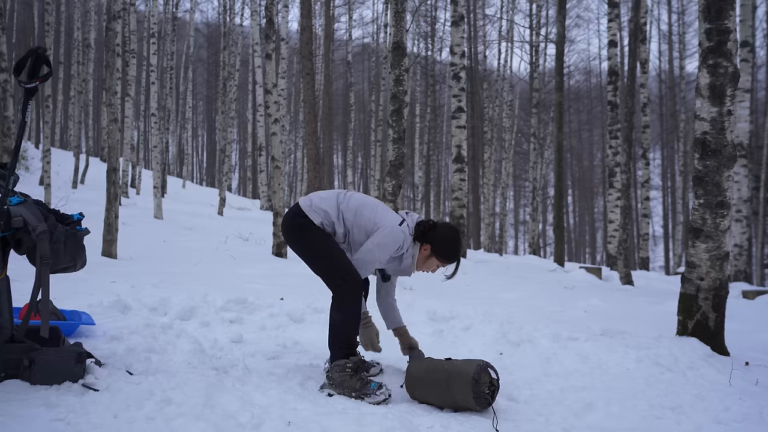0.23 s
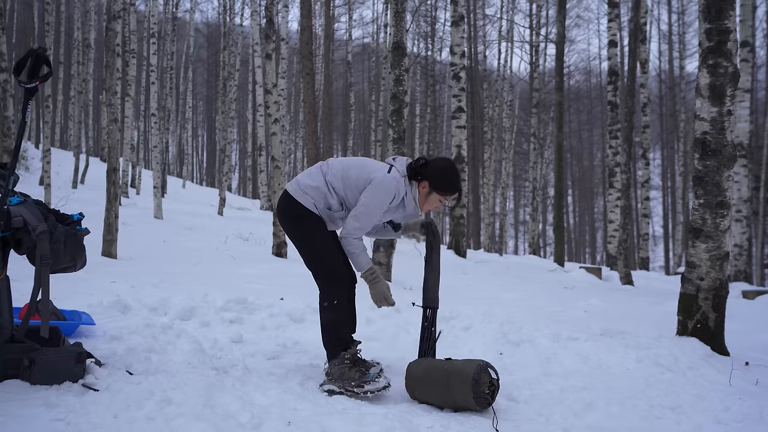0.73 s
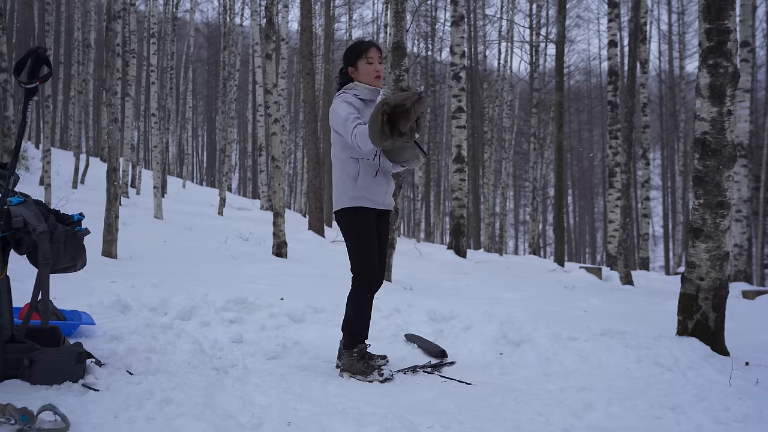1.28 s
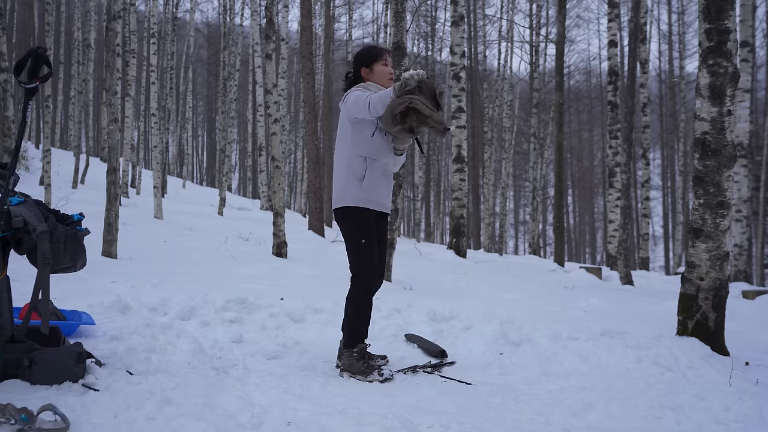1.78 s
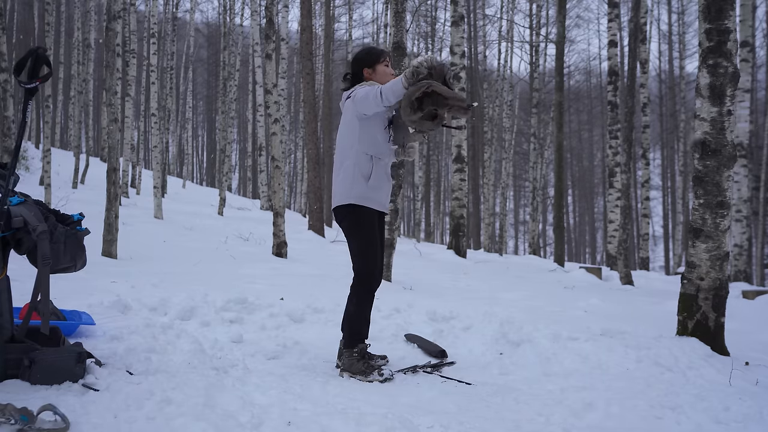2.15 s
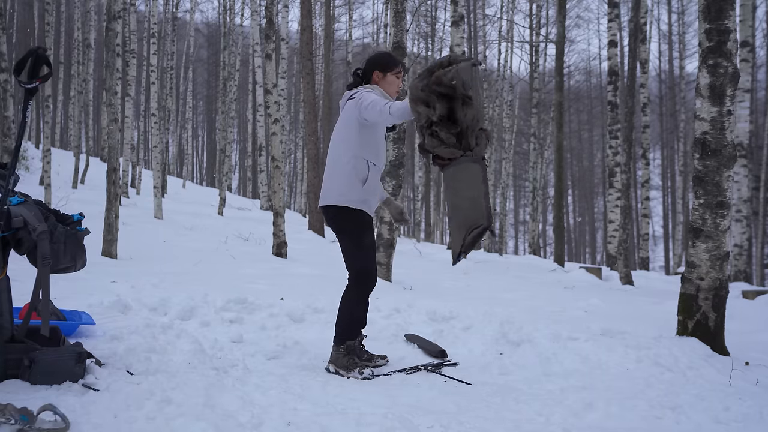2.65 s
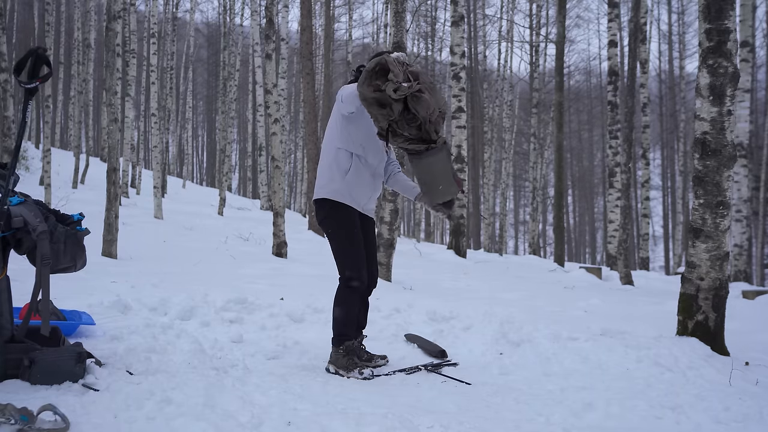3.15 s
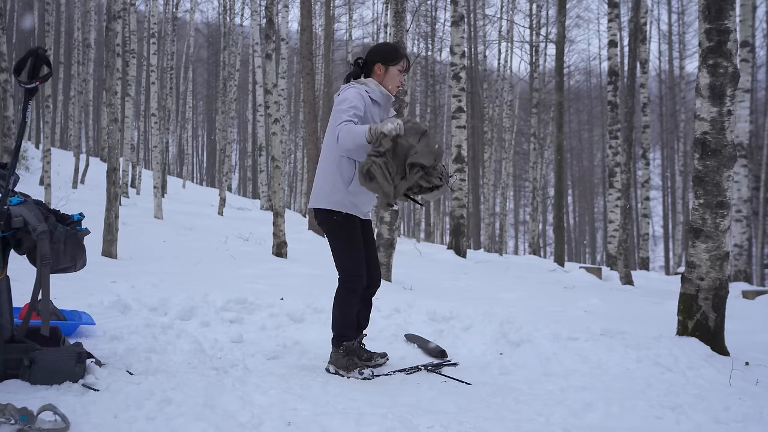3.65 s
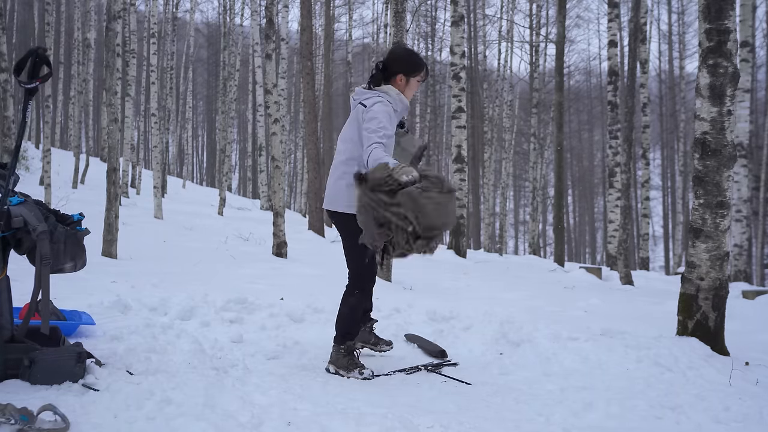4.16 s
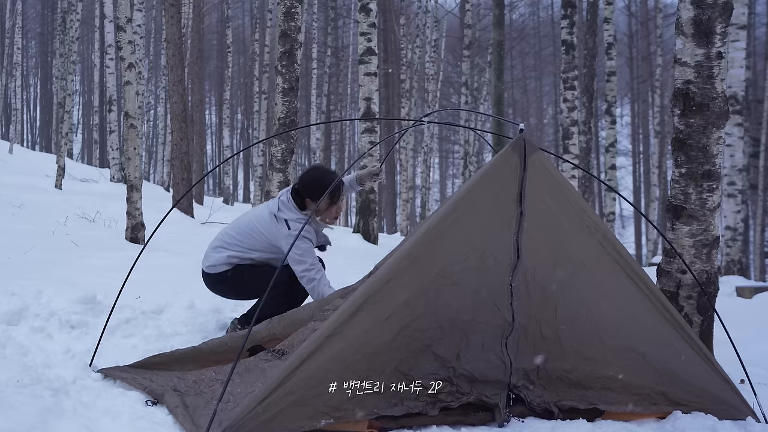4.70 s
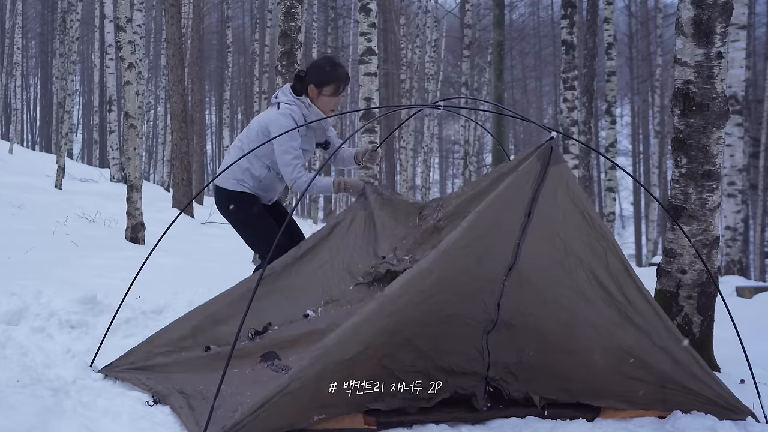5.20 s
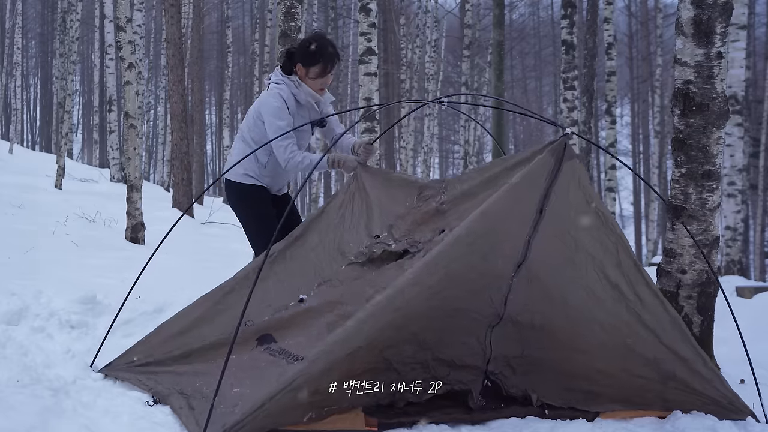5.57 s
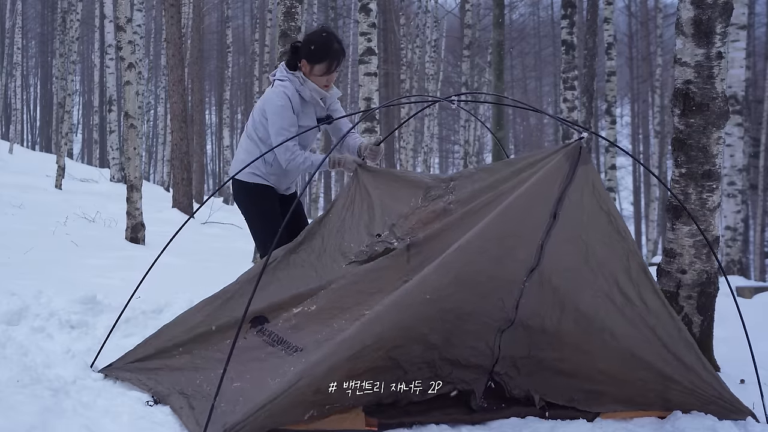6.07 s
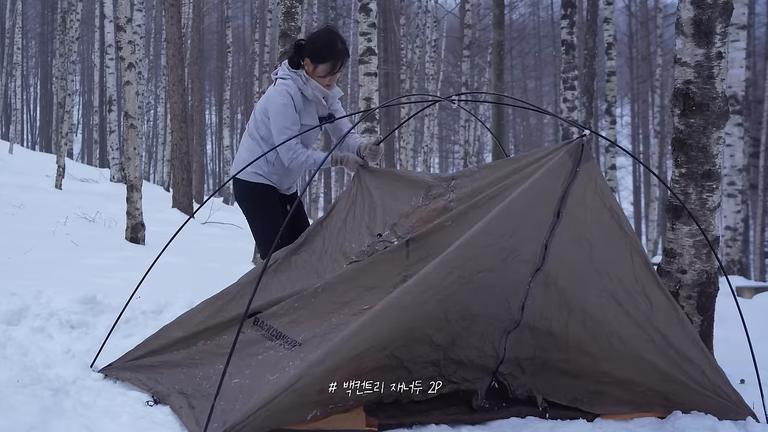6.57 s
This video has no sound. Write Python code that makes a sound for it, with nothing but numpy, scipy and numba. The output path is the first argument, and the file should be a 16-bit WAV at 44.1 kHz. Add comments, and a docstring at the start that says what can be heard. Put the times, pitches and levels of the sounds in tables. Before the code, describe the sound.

In a quiet snowy wood, a stiff nylon tent is unpacked close to a small microphone. Bright swishes and rasps come with knocking, jingling metal pegs or poles, then an abrupt cut. Cloth crumples and snaps, panels thud, a quieter shake-out follows, then stronger flaps. After another cut, fabric is drawn in a long hissing swish that settles into faint rustles and ticks. Dry, with no echo.

```python
"""Stiff nylon tent cloth is pulled from its bag, shaken out and dragged over poles in a still, snowy wood.
Filtered hiss and tiny damped tones make the weave swish, folds crumple and broad panels billow.
Short noise bursts make creases snap, panels thud and pegs knock; the knocks also set the metal ringing.
Narrow bands of noise rasp along a pole or cord. The snow gives no echo.
Three times the sound stops dead and the next passage fades in."""
import sys
import numpy as np
from scipy import signal
from scipy.fft import rfft, irfft
from scipy.io import wavfile
from scipy.ndimage import uniform_filter1d
from numba import njit

SR = 44100
rng = np.random.default_rng(int(sys.argv[2]) if len(sys.argv) > 2 else 0)


def boost_factor(decibels):
    """Convert a level in decibels to a linear amplitude factor."""
    exponent = np.asarray(decibels, float) / 20
    return 10 ** exponent


def file_out(sig):
    """Save sig as 16-bit WAV at sys.argv[1]."""
    # one column per channel
    cols = np.atleast_2d(sig).T
    # limit, then scale
    lim = np.clip(cols, -1, 1)
    pcm = np.round(lim * 32767).astype(np.int16)
    wavfile.write(sys.argv[1], SR, pcm)


N = 301644  # length in samples


def walk(rate):
    """Uneven motion: random levels, each held for 1 / rate seconds with smoothed steps; spread 1."""
    hold = int(SR / rate)
    steps = np.repeat(rng.standard_normal(N // hold + 1), hold)
    smooth = uniform_filter1d(steps, hold // 2)[:N]
    return smooth / np.std(smooth)


def colour(x, shape):
    """Gives a sound the tone colour drawn by (Hz, dB) points, without pre-echo; the result has rms 1."""
    hz, db = np.transpose(shape)
    grid_hz = np.linspace(1, SR / 2, 2049)
    # beyond the first and last points the level drops steeply
    curve_db = np.interp(np.log(grid_hz), np.log(hz), db, db[0] - 22.5, db[-1] - 27.5)
    # folding the cepstrum makes the filter respond as early as it can
    cepstrum = irfft(np.log(boost_factor(curve_db)))
    cepstrum[1:2048] *= 2
    cepstrum[2049:] = 0
    response = irfft(np.exp(rfft(cepstrum)))[:2048]
    y = signal.fftconvolve(x, response)[:N]
    return y / np.std(y)


@njit
def ring(start, hz, cycles, size, n):
    """Each tiny fold flicks over as a grain: a short sine that dies away."""
    out = np.zeros(n)
    for k in range(len(start)):
        turn = np.exp((2j * np.pi - 1 / cycles * 3) * hz[k] / SR)  # one sample of swing and decay
        z = size[k] + 0j
        for i in range(start[k], min(n, start[k] + int(2 * cycles * SR / hz[k]))):
            out[i] += z.real
            z *= turn
    return out


def cloth(shape, grain, crackle, tug):
    """Sliding weave hisses; tiny folds flick over as grains; uneven tugging shakes both."""
    rate, low_hz, high_hz, cycles, scatter_db, flicker_db, follow = grain
    when, pitch, strength, side = rng.random((int(rate * N / SR), 4)).T
    # many small grains, a few large ones, pushing either way
    size = boost_factor(-scatter_db * np.log(1 - .99 * strength)) * np.sign(side - .5)
    start = (when * N).astype(np.int64)
    flicks = ring(start, low_hz * (high_hz / low_hz) ** pitch, 1. * cycles, size, N)
    hiss = colour(rng.standard_normal(N), shape)
    mix = np.sqrt(crackle) * colour(flicks, shape) + np.sqrt(1 - crackle) * hiss
    # the jerkier the handling, the deeper the tugging
    shake_db = follow * tug * (0.26 + 1.15 * crackle)
    return mix * boost_factor(shake_db + flicker_db * walk(16))


def all_cloth(t, effort_db, bulk_db, taut_db, tug):
    """Five parts of the cloth follow the hands, each answering differently to bulk, tautness and spread."""
    # tone colour of each part: pitch_hz, level_db
    swish = [(1500, -19), (2600, -10.5), (3600, -2.5), (5200, 0), (7000, -6), (9000, -9), (12000, -15.5),
             (16400, -26)]
    sheen = [(6000, -3), (8500, 0), (10500, -0.5), (13000, -6.5), (16400, -8)]
    crumple = [(800, -36.5), (1250, -3.5), (1700, -0.5), (2500, -2), (3500, -7), (5000, -41.5)]
    rumple = [(350, -18), (600, -7.5), (900, -5.5), (1250, -4.5), (2000, -20.5)]
    billow = [(50, -58), (90, -29), (160, -13), (240, -3), (380, 1), (550, -2), (900, -27)]
    # grains, one row per part in that order: grains per second, low_hz, high_hz, length in cycles,
    # size_scatter_db, own_flicker_db, share of the tugging (0-1)
    grains = [(2450, 2710, 11800, 4.3, 4.5, 0.28, 0.42), (2500, 4600, 19000, 3.3, 7, 1.5, 0.46),
              (1167, 1300, 2600, 1.2, 4.5, 1.06, 0.4), (600, 510, 1640, 2.8, 3.5, 0.14, 0.26),
              (248.3, 137, 730, 3.5, 1, 1, 0.96)]
    # loudness, one row per part in that order: level_db over the effort,
    # then dB per dB of bulk, of tautness and of spread
    responses = [(-0.78, 0.215, -0.087, 0.039), (-0.5, 0.2, 0.93, 0.21), (-2, 1.02, -0.092, -0.49),
                 (-5, 1.1, 0.0056, 0.81), (-8, 0.98, 0.08, 1.21)]
    # how jerky the handling is: time_s, crackle share (0-1)
    jerkiness = [(0, 0.33), (.9, 0.62), (1, 0.8), (1.25, 0.7), (1.3, 0.21), (2.2, 0.28), (2.4, 0.2),
                 (3.3, 0.6), (3.5, 0.1), (4.7, 0.41), (5.3, 0.2), (6, 0), (6.84, 0.48)]
    # how much loose cloth hangs free, wide panels sounding deeper: time_s, spread_db
    spread = [(0, 6), (.05, -5.5), (.9, -2.5), (1.25, -6.5), (1.3, -2), (1.7, 4), (2.05, 3.5), (2.3, 0.5),
              (2.9, -1.5), (3.5, -1.5), (3.95, -2), (4.04, 7.5), (4.1, -1), (4.7, -1), (5.1, 2.5), (6, 0.5),
              (6.84, -1.5)]

    crackle = np.clip(np.interp(t, *np.transpose(jerkiness)), 0, 1)
    spread_db = np.interp(t, *np.transpose(spread))
    sound = np.zeros(N)
    for shape, grain, response in zip((swish, sheen, crumple, rumple, billow), grains, responses):
        db, by_bulk, by_taut, by_spread = response
        part_db = effort_db + db + by_bulk * bulk_db + by_taut * taut_db + by_spread * spread_db
        sound += boost_factor(part_db) * cloth(shape, grain, crackle, tug)
    return sound


def bursts(table, sharp, hold):
    """Sharp noise bursts, each through a broad resonance taken twice; hold > 1 delays the decay."""
    out = np.zeros(N + 4096)
    ms = np.arange(4096) / SR * 1000
    for s, db, hz, t60_ms in table:
        fade = boost_factor(-60 * (ms / max(t60_ms, 2)) ** hold)
        attack = np.minimum(ms / 0.16, 1)
        burst = rng.standard_normal(len(ms)) * fade * attack
        peak = signal.iirpeak(hz, sharp, SR)
        burst = signal.lfilter(*peak, signal.lfilter(*peak, burst))
        first = int(s * SR)
        out[first:first + len(ms)] += boost_factor(db) * burst / np.abs(burst).max()
    return out[:N]


def snaps(work_db):
    """A crease in the cloth buckles; smaller ones tick in between, louder the harder the cloth is worked."""
    # creases that snap: start_s, peak_db, pitch_hz
    creases = [(1.3182, -21.5, 2140), (1.45, -12.5, 3610), (1.4817, -8.5, 2880), (1.4963, -20, 7400),
               (1.5727, -16, 9000), (1.591, -4.5, 3670), (1.6617, -7, 3740), (1.6826, -8, 3910),
               (1.7359, -6.5, 5000), (1.9879, -10, 5780), (2.2412, -4.5, 5300), (2.2927, -17, 4400),
               (2.314, -25, 3400), (2.3298, -23, 2490), (2.3397, -14.5, 4400), (2.3455, -25, 3110),
               (2.3656, -28, 2440), (2.3741, -25, 3620), (2.442, -34, 8050), (2.6299, -21.5, 7880),
               (2.6576, -19, 4110), (2.7241, -29, 10250), (2.7307, -28.5, 4000), (2.7515, -31, 8660),
               (3.0028, -29, 2610), (3.0202, -30.5, 3840), (3.1323, -30, 2390), (3.2262, -22, 4870),
               (3.2358, -16, 5090), (3.2516, -18, 3530), (3.2732, -19.5, 3330), (3.4507, -24, 8040),
               (3.5668, -16, 7250), (3.9852, -6.5, 7100), (4.0219, -8.5, 9020), (4.1286, -18, 8560),
               (4.1658, -18, 4410), (4.3478, -19, 3150), (4.5991, -34, 2310), (4.6932, -33, 3430),
               (4.732, -20, 5000), (4.8412, -15, 9170), (4.861, -8, 5220), (4.9783, -9.5, 5490),
               (5.399, -11.5, 5280), (5.4594, -15.5, 8790), (5.6503, -16.5, 3670), (5.6762, -21, 3030),
               (5.8766, -25, 2690), (6.2018, -17, 1700), (6.2871, -24, 3650), (6.4193, -15.5, 1900),
               (6.4834, -16, 2660), (6.4909, -25, 1500), (6.5205, -31, 4630), (6.5843, -15.5, 4460),
               (6.6296, -29, 5970), (6.6412, -21.5, 4220), (6.7317, -25, 4960), (6.7523, -20.5, 4890)]
    ticks_per_s, low_hz, high_hz = 14, 2200, 6000
    over_work_db, scatter_db = 7, 1.5
    ticks = []
    for when, strength, pitch in rng.random((int(ticks_per_s * N / SR), 3)):
        db = work_db[int(when * N)] + over_work_db - scatter_db * np.log(1 - .95 * strength)
        ticks.append((when * N / SR, db, low_hz * (high_hz / low_hz) ** pitch))
    t60_ms = 11.3  # time to die away by 60 dB
    return bursts([(s, db, hz, t60_ms) for s, db, hz in creases + ticks], sharp=0.7, hold=0.81)


def rattles(jingle):
    """Light metal knocks through the pouch and rings briefly; small knocks merge into a jingle."""
    # pegs or pole ends knocking in their pouch: start_s, strength_db, t60_ms (time to die away by 60 dB)
    hits = [(0.0944, -15, 15), (0.317, -15.5, 27), (0.3562, -9, 22), (0.3683, -2, 8.5), (0.415, -15, 24),
            (0.4562, -16, 30), (0.4706, -17, 17), (0.5081, -16, 24), (0.539, -18, 17), (0.573, -8, 17),
            (0.5897, -3.5, 14), (0.6353, -12, 17), (0.694, -14.5, 19), (0.7236, -4.5, 26),
            (0.7513, -7.5, 17), (0.7788, -16.5, 6.6), (0.7945, -12, 15), (0.836, -15, 30),
            (0.8568, -13, 19), (0.8876, -21, 20), (0.9577, -17, 16), (0.9681, -9, 5.4), (1.0164, -8, 11),
            (1.0375, -13, 6), (1.044, 3, 25), (1.0494, -2, 35), (1.0539, 0, 44), (1.0892, -12, 25),
            (1.1187, -14, 57), (1.1373, -13, 9), (1.161, -5, 39), (1.179, -6, 10), (1.1845, -6.5, 15),
            (1.2158, -14, 7), (1.2247, -5.5, 8), (1.237, -5, 21), (1.244, -8.5, 20)]
    # what the metal rings with: pitch_hz, width_hz, level_db
    metal = [(4630, 520, -3.5), (5530, 250, -2.5), (5950, 370, -4.5), (7770, 250, -8), (9300, 300, -11),
             (10330, 200, -3.5), (11820, 250, -6.5), (14000, 200, -4.5)]
    full_hz, hz_per_db = 6160, 60  # centre of a 0 dB knock in the pouch; softer ones are duller
    tipped_out_s, bare_hz = .95, 1000  # once tipped out, the metal knocks brighter by this much
    rows = []
    for s, db, t60_ms in hits:
        rows.append((s, db, full_hz + hz_per_db * db + bare_hz * (s > tipped_out_s), t60_ms))
    knocks = bursts(rows, sharp=0.87, hold=1.18)
    patter = rng.standard_normal(N) * boost_factor(4.4 * walk(200))
    drive = boost_factor(1) * knocks + jingle * patter / np.std(patter)  # knocks drive the metal 1 dB harder
    sound = 0.62 * knocks
    for hz, width_hz, db in metal:
        sound += boost_factor(db) * signal.lfilter(*signal.iirpeak(hz, hz / width_hz, SR), drive)
    return sound


def thuds():
    """A slack panel is jerked tight with a short low thud; its lowest pitches are cut away steeply."""
    # panels that pull taut: start_s, peak_db (before the bass is cut), pitch_hz
    panels = [(.366, -24.5, 800), (.576, -31.5, 294), (.734, -28, 910), (.9215, -35.5, 840),
              (1.0546, -30, 810), (1.3184, -32, 770), (1.4821, -31, 600), (1.925, -16, 420),
              (1.995, -17.5, 297), (2.014, -12.5, 226), (2.105, -27, 217), (2.21, -19, 377),
              (2.2421, -22, 272), (3.3004, -25, 700), (4.0, -14, 344), (4.032, -14, 460),
              (4.1395, -23.5, 650), (4.5275, -29, 540), (5.6943, -20.5, 700), (5.8767, -19, 800),
              (6.2021, -30, 900), (6.332, -33, 600), (6.4193, -35, 855), (6.491, -35, 900),
              (6.76, -39, 800)]
    t60_ms, slope = 31, 1.4  # dying-away time at 500 Hz; deeper panels last longer by this power
    rows = [(s, db, hz, t60_ms * (500 / hz) ** slope) for s, db, hz in panels]
    bass_cut = signal.butter(4, 170, "high", fs=SR, output="sos")
    return signal.sosfilt(bass_cut, bursts(rows, sharp=0.94, hold=1.02))


def rasp(t):
    """Cloth sticks and slips along a pole or cord: narrow-band noise swelling and fading with the stroke."""
    # strokes: start_s, end_s, pitch_hz, width_hz, level_db (before swell and flutter)
    strokes = [(0.156, 0.233, 5330, 1500, -29), (0.615, 0.667, 2600, 300, -38),
               (0.735, 0.779, 5400, 700, -25), (2.84, 2.982, 11100, 2000, -50),
               (2.87, 2.974, 6400, 1200, -50), (2.876, 3.043, 1680, 500, -60),
               (3.5, 3.756, 1740, 500, -37.5), (5.563, 5.89, 1470, 180, -35.5)]
    out = np.zeros(N)
    for start, end, hz, width_hz, db in strokes:
        band = signal.lfilter(*signal.iirpeak(hz, hz / width_hz, SR), rng.standard_normal(N))
        swell = np.sin(np.pi * np.clip((t - start) / (end - start), 0, 1)) ** .5
        out += boost_factor(db) * band / np.std(band) * swell
    return out * boost_factor(1.5 * walk(60))


def scene():
    """The hands drive the cloth, ticks and jingle; snaps, thuds and rasps join in, all in the centre."""
    # how the hands work the cloth, in time order: time_s, effort_db, bulk_db (cloth moved), taut_db
    handling = [
        [(0.0, -61, 4, -11), (0.043, -56.5, 3.5, -8)],
        [(0.06, -54, -5, -8), (0.086, -59, 5, -9), (0.092, -32, -26, -11), (0.118, -34.5, -6.5, -12),
         (0.168, -26.5, -13, -8), (0.338, -29, -7.5, -11), (0.372, -25, -10, -19), (0.382, -36, -5, -14.5),
         (0.58, -24, -10.5, -18), (0.59, -13, -26, -13), (0.604, -23, -14.5, -12), (0.686, -35.5, -2, -7),
         (0.694, -25.5, -9, 3), (0.75, -23.5, -11, -6), (0.826, -32.5, -8.5, -9), (0.862, -29.5, -9.5, -13),
         (0.946, -44, -15.5, -5), (0.968, -26, -24.5, 11), (0.986, -32.5, -18, -4), (1.056, -19.5, -25, 1),
         (1.076, -27, -23, 0), (1.098, -27.5, -23, -7), (1.244, -20, -21, -20), (1.252, -30, -20, -9)],
        [(1.262, -85, 29, -4), (1.322, -36.5, 4.5, -8), (1.408, -37.5, 1, -10), (1.49, -29, -0.5, -6.5),
         (1.566, -25.5, -4.5, -12), (1.594, -24.5, -3.5, -12.5), (1.604, -27, -3, -8.5),
         (1.648, -26.5, -1, -14.5), (1.666, -20.5, -10, -21), (1.67, -29.5, 0, -17.5),
         (1.862, -24.5, -3.5, -8.5), (1.944, -24.5, 1, 0.5), (2.036, -24, -4, -0.5), (2.162, -29.5, -2, -10.5),
         (2.222, -20.5, -9.5, -9), (2.244, -21.5, -4.5, -14.5), (2.272, -42, 0.5, -9), (2.348, -46, 9, -8),
         (2.412, -48.5, 5.5, -24), (2.462, -52, 3.5, -9), (2.544, -33, -1, -12), (2.67, -40, 2, -14),
         (2.784, -58, 3.5, -12), (2.916, -55.5, 7.5, -1), (3.018, -42.5, -2, -17), (3.052, -58.5, 4.5, -10),
         (3.216, -50.5, 1.5, -7), (3.222, -47, -6, -13)],
        [(3.226, -38, -3, -9), (3.232, -41.5, 1, 2), (3.274, -30.5, 2, -2.5), (3.34, -36, 0.5, -6),
         (3.392, -39, 3.5, -11), (3.448, -38, 3.5, -6), (3.478, -43.5, 7, -16), (3.578, -31.5, -0.5, -7),
         (3.7, -33, -0.5, -6)] + [(3.715, -26.5, -3, -6), (3.763, -31, -1, -1), (3.887, -30, 0, 2.5),
         (3.911, -20.5, -5.5, 0), (3.953, -26.5, 0, 0.5), (3.989, -21.5, -3, 4), (4.031, -26.5, 3.5, 3.5),
         (4.061, -35.5, -5.5, -15), (4.119, -39, 4.5, -11), (4.127, -32.5, 1.5, -4), (4.233, -39.5, 2.5, -13),
         (4.313, -35, -1, -11), (4.427, -45, 5, -12), (4.497, -35.5, 2.5, -7), (4.583, -44, 4.5, -14),
         (4.699, -42.5, 2.5, -13), (4.712, -43, -4, -14)],
        [(4.72, -19, 0, -5), (4.73, -36, -7, -4), (4.75, -31.5, -1, -10.5), (4.95, -23.5, -6.5, -5.5),
         (5.18, -23.5, -8.5, -4.5), (5.91, -32.5, -3.5, -5), (5.94, -30.5, -6, -10), (6.57, -39, -4.5, -7),
         (6.59, -37, -6.5, -10), (6.6, -41.5, -2.5, -1), (6.74, -39.5, -5, -9.5), (6.84, -39.5, -4, -4)],
    ]
    # how much the metal jingles while the pouch is handled: time_s, level_db over the effort
    jingling = [(0, -22), (.4, -6), (.9, -11), (.96, 1.5), (1.25, -10)]
    # where the sound stops dead: time_s, fade_in_s of what follows
    cuts = [(.043, .03), (1.2525, .04), (4.713, .015)]

    t = np.arange(N) / SR
    s, *columns = np.concatenate(handling).T
    effort_db, bulk_db, taut_db = (np.interp(t, s, c) for c in columns)
    tug = 2.3 * walk(47) + 1.5 * walk(160)  # slow tugs and quick jerks, in dB
    jingle = boost_factor(effort_db + np.interp(t, *np.transpose(jingling)) + tug)

    sound = all_cloth(t, effort_db, bulk_db, taut_db, tug)
    sound += snaps(effort_db + 0.41 * bulk_db)  # more cloth in the hands, louder ticks
    sound += rattles(jingle) * (t < cuts[1][0])  # no metal after the second stop
    sound += thuds()
    sound += rasp(t)
    for cut, fade in cuts:
        # 7 ms of silence, then the fade-in
        sound = sound * np.where(t < cut, 1, np.clip((t - cut - .007) / fade, 0, 1))
    return np.array([sound, sound])


def band_limit(x):
    """A steep low-pass at the top of the band."""
    return signal.sosfilt(signal.butter(12, 16290, fs=SR, output="sos"), x)


def record(dry):
    """The small microphone loses the deep bass, the peaks clip and the top is cut."""
    bass_cut = signal.butter(2, 90, "high", fs=SR, output="sos")
    top_cut = signal.ellip(8, .2, 70, 15650, fs=SR, output="sos")
    clipped = np.clip(signal.sosfilt(bass_cut, dry), -1, 1)
    mix = signal.sosfilt(top_cut, clipped)
    return band_limit(mix)


dry = scene()
out = record(dry)
file_out(out)
```